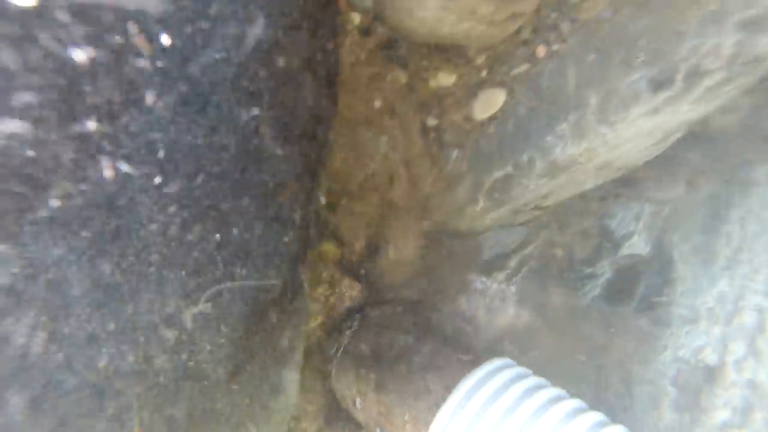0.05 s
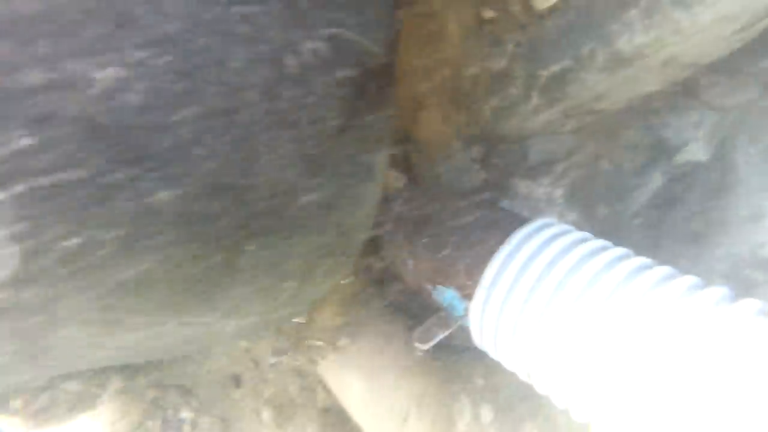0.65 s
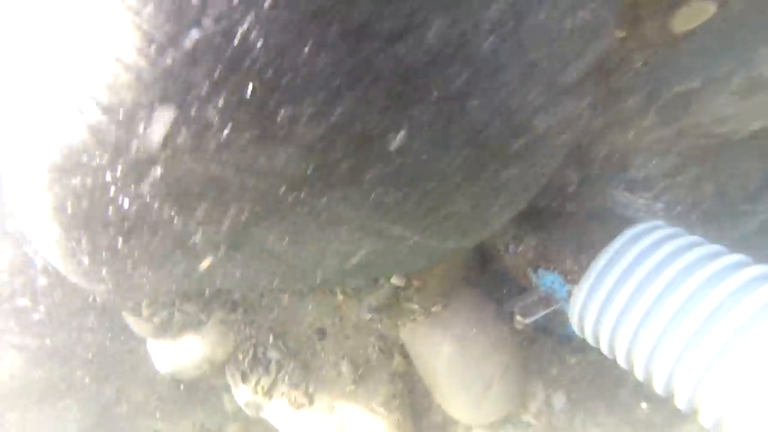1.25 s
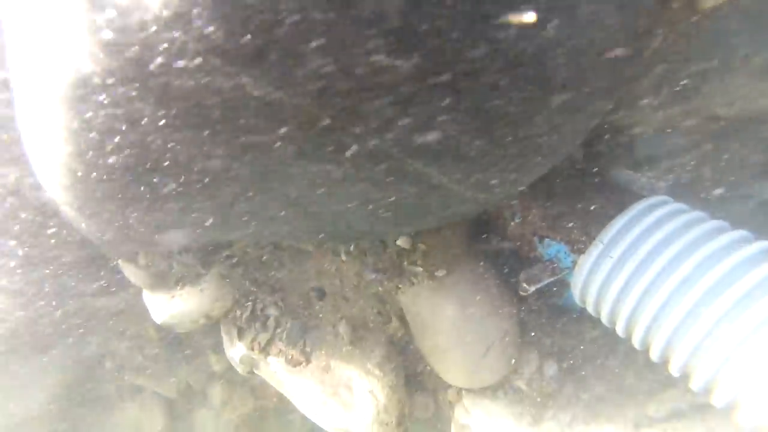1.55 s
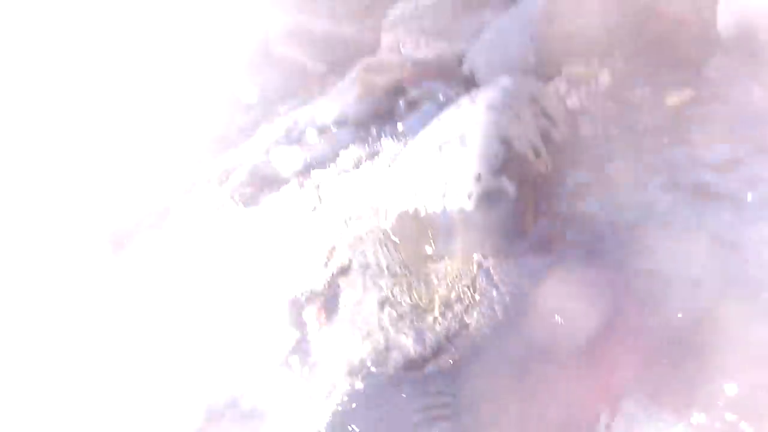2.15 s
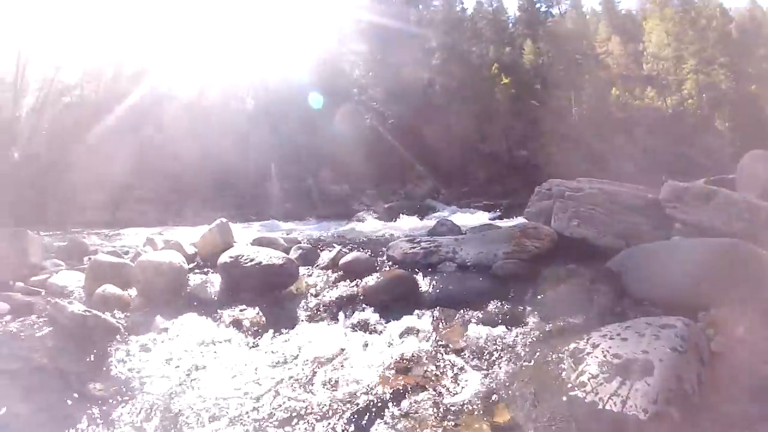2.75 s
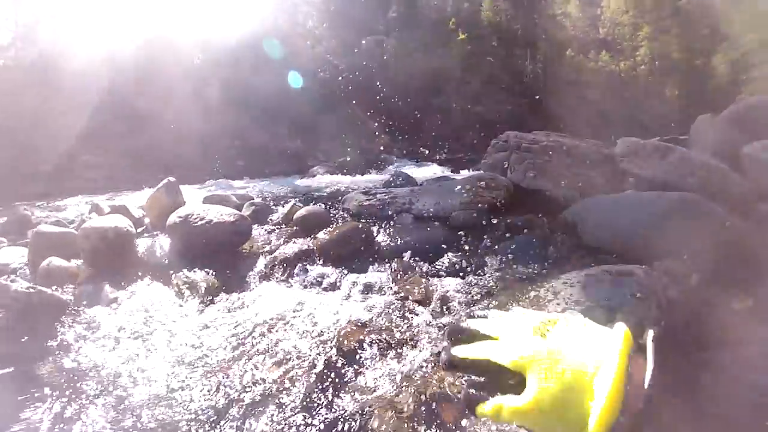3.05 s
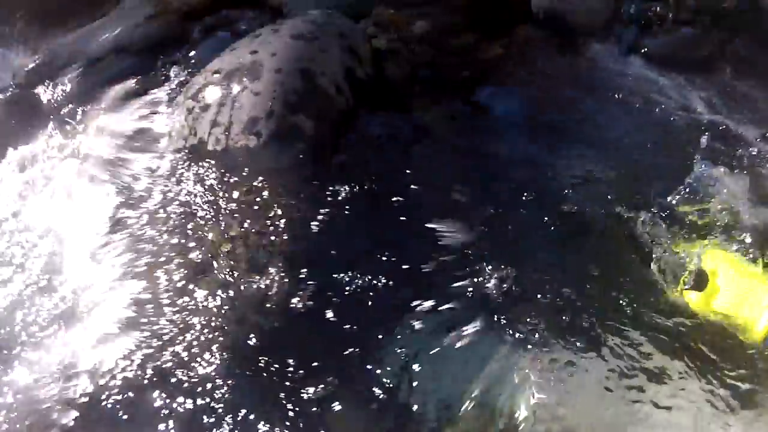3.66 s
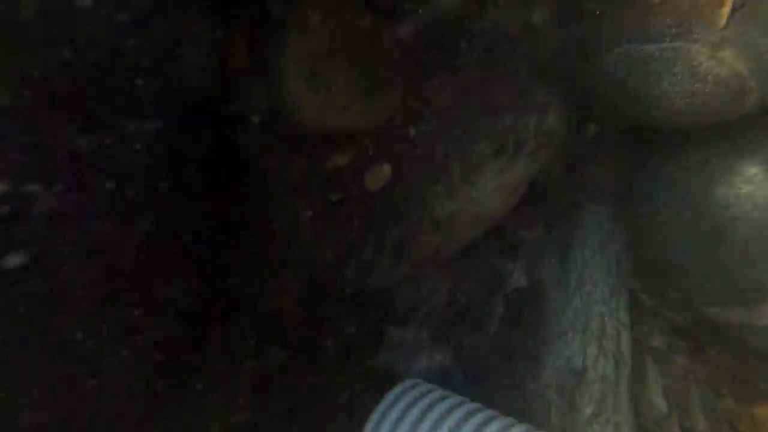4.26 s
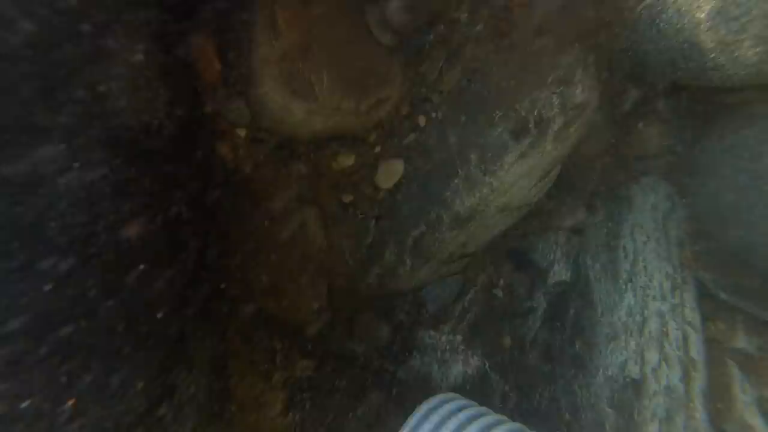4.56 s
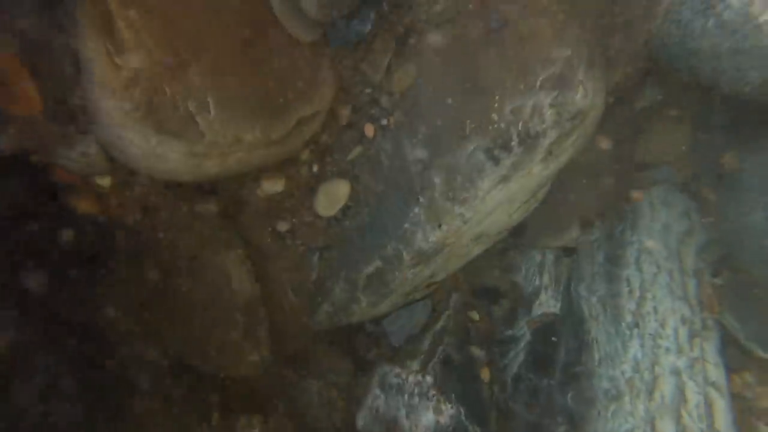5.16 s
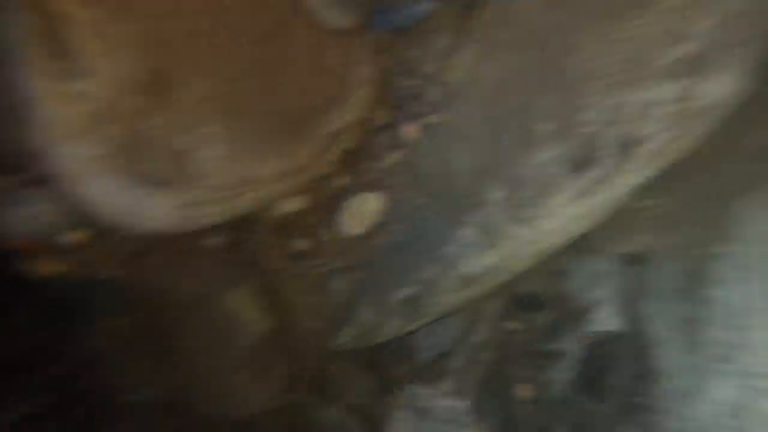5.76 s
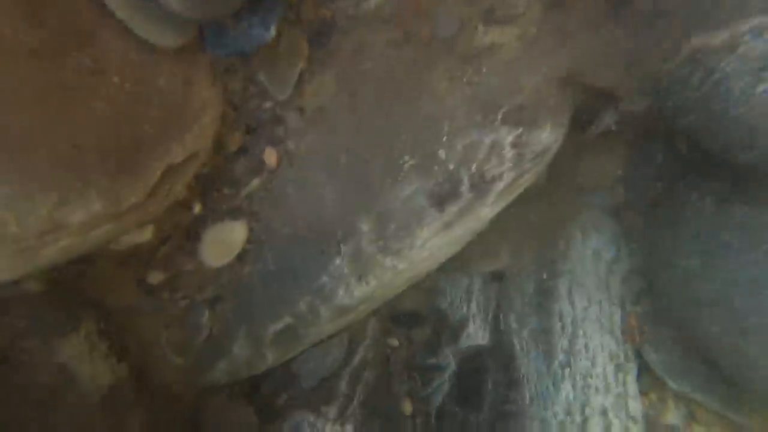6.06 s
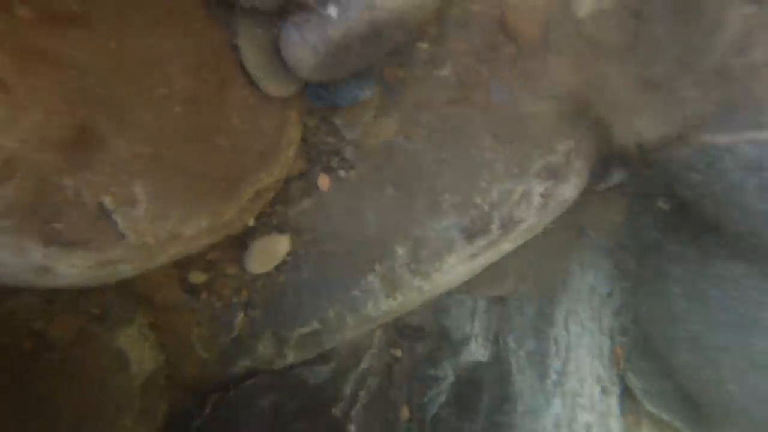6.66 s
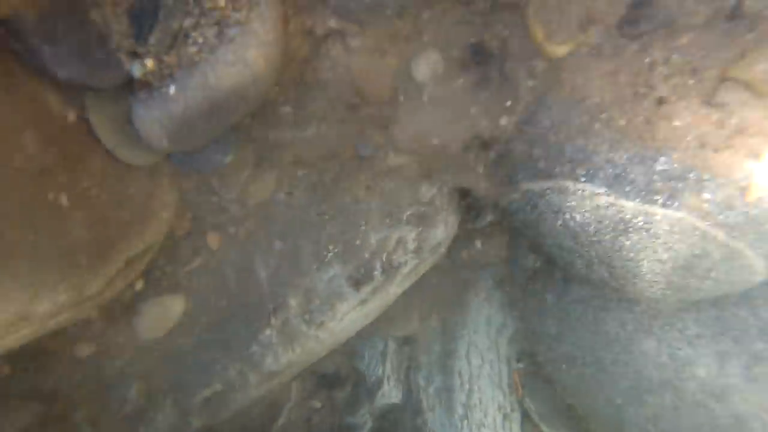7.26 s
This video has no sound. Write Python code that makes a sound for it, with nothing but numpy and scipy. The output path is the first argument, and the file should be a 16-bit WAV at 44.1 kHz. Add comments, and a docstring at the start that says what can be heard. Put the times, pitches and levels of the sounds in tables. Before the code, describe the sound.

Close underwater, stones clack and ring against a suction dredge nozzle over crackling sand and a low intake rumble. The microphone, in a waterproof case, lifts into the air, where rapids rush more quietly and a small pump engine ticks faintly. It plunges back with a loud burst of ringing bubbles and a faint whistle. Gravel then rattles in, stones clack, and cobbles thud against the hose, hardest near the end.

```python
"""A camera in a waterproof case sits by the nozzle of a suction dredge on a stream bed: stones clack up the
hose, ringing nozzle and case, sand crackles and the intake rumbles. By 1.8 s the camera is up in the air,
where rapids rush and the pump's single-cylinder engine ticks. At 4 s it plunges back through a burst of
ringing bubbles, trailed by a faint whistle. From about 4.8 s gravel rattles in, and cobbles thud against
the hose, hardest near the end."""
import sys
import numpy as np
from scipy import signal
from scipy.fft import rfft, irfft, next_fast_len
from scipy.io import wavfile
from scipy.ndimage import uniform_filter1d

SR = 44100
rng = np.random.default_rng(int(sys.argv[2]) if len(sys.argv) > 2 else 0)


def dump_mix(stems):
    """Bounce the given channels to the path in sys.argv[1] as a 16-bit WAV at rate SR."""
    frames = np.atleast_2d(stems).T  # one column per channel
    limited = np.clip(frames, -1, 1)  # hard clip at full scale
    pcm = np.round(limited * 32767).astype(np.int16)
    wavfile.write(sys.argv[1], SR, pcm)


N = 326781
T = np.arange(N) / SR
RING_T = np.arange(4096) / SR
MIDDLE_STONE_HZ = 2000

# larger stones striking nozzle and hose: t/s, ring level/dB, ring f/Hz, crack against the ring/dB
STONE_HITS = [(0.044, -36.5, 1900, -9), (0.0615, -31, 1760, -11), (0.1762, -33.5, 1806, -45),
              (0.202, -26, 2110, -21), (0.2126, -21.5, 2000, -26), (0.2858, -36.5, 1830, -5),
              (0.3397, -33, 1760, -7), (0.4109, -32.5, 1700, -1.5), (0.4542, -34.5, 1784, -7),
              (0.5726, -38.5, 2240, -3), (0.634, -24.5, 1435, -7), (0.6959, -20.5, 2310, -9.5),
              (0.744, -17, 2370, -20.5), (0.7703, -35.5, 2530, -7), (0.806, -29.5, 2290, -10),
              (0.8206, -22, 1660, -11.5), (0.885, -22, 1690, -16), (0.9677, -34, 1550, -13),
              (1.006, -18.5, 1745, -17), (1.0642, -34.5, 2050, -2), (1.076, -25, 2220, -6.5),
              (1.1046, -26.5, 2150, -5), (1.1146, -26.5, 2110, -5), (1.147, -37.5, 2200, -5),
              (1.2034, -38.5, 2190, 3), (1.2954, -32, 2120, -7.5), (1.3769, -22.5, 1965, -12),
              (1.431, -42.5, 2270, -1), (1.4637, -48.5, 2170, 10.5), (1.5011, -23, 2000, -15.5),
              (1.52, -31.5, 1875, -11), (1.558, -30.5, 1670, -15), (1.6213, -38.5, 2060, 0.5),
              (1.7962, -44.5, 2250, -0.5), (1.8571, -43.5, 1900, -3.5), (4.8384, -25, 2320, -11.5),
              (4.8578, -26, 1920, -23), (4.8811, -24.5, 1950, -22), (5.0727, -19.5, 2140, -9),
              (5.1295, -13, 2160, -36), (5.1684, -12, 1760, -24.5), (5.226, -16, 2050, -22),
              (5.2667, -21.5, 1710, -16.5), (5.3319, -19.5, 2280, -35), (5.3485, -26, 2100, -13),
              (5.4353, -25, 2400, -18.5), (5.5313, -23, 2300, -13.5), (5.6684, -21, 2300, -29),
              (5.6801, -19.5, 2130, -43), (5.7247, -26.5, 2360, -7), (5.742, -24.5, 2210, -8),
              (5.7769, -19, 1960, -29), (5.8533, -21, 2280, -14.5), (5.8798, -14, 2230, -17.5),
              (6.0482, -22, 2410, -17), (6.1012, -18.5, 1895, -23.5), (6.1219, -15, 1772, -20.5),
              (6.176, -27, 2350, -40), (6.561, -16, 1820, -52), (6.5798, -20.5, 1770, -24.5),
              (6.61, -23.5, 1800, -19.5), (6.6653, -27.5, 2425, -6.5), (6.7801, -16.5, 2450, -23),
              (6.797, -26, 2380, -25), (6.81, -25, 1800, -5.5), (6.8899, -25.5, 2240, -20),
              (6.954, -7.5, 1836, -31.5), (7.0972, -17.5, 1890, -24.5), (7.166, -31, 2450, -19),
              (7.2364, -24, 2106, -31), (7.3143, -33.5, 2340, -6.5), (7.3712, -31, 2000, -13)]
# turbulence in the intake: t/s, level/dB
TURBULENCE = [(0, -42), (0.25, -51), (0.5, -58), (1.1, -65.5), (3.8, -60.5), (4.66, -62), (4.88, -45),
              (5.1, -39), (5.45, -41.5), (5.7, -48), (5.95, -51), (6.1, -40.5), (6.55, -33), (6.7, -50),
              (7.41, -45)]
# a blow's four registers (knock, ring, clink, crack): low f/Hz, high f/Hz
REGISTER_BANDS = ((420, 1200), (1350, 2750), (2950, 4500), (4200, 18000))
REGISTER_FILTERS = [signal.butter(3, band, "bandpass", fs=SR, output="sos") for band in REGISTER_BANDS]


def stones(knock_db_per_octave=-9):
    """Stones hit the nozzle: heavy ones ring lower and knock more, hard contacts clink more."""
    # how close the case is to the nozzle: t/s, nearness (0 is far)
    nearness = [(0, 0.56), (0.2, 1), (0.45, 0.26), (0.65, 0.86), (1.15, 0.73), (1.45, 1.2), (1.8, 0.32),
                (4.9, 0.22), (6.1, 0), (7.0, 0.39)]
    out = np.zeros(N)
    for s, db, hz, crack in STONE_HITS:
        near = curve(nearness, s)
        knock = -30 + 21 * near + knock_db_per_octave * np.log2(hz / MIDDLE_STONE_HZ)
        clink = -4 + 7 * near + 0.46 * crack
        blow = pebble(hz, near, own_db=1, own_t60=0.026, scatter_db=3, rebound=0.3, crunch=0.41)
        add(out, s, undb(db + np.array([knock, 0, clink, crack])) @ blow)
    return out


def pebble(ring_hz, near=0, own_db=0, own_t60=0.023, scatter_db=6, scrape=0.056, rebound=0.39,
           crunch=0.26):
    """One blow rings stone, nozzle and case: four registers, each at rms 1 over its first 10 ms."""
    # resonances of nozzle and case together: f/Hz, level/dB, t60/s, gain close to the nozzle/dB
    resonances = [(596, -24.5, 0.015, 13.5), (783, 1.5, 0.029, -4.5), (878, 1.5, 0.04, 0),
                  (1024, -7, 0.07, 14), (1328, -32, 0.13, -6), (1760, -8, 0.057, -4),
                  (2050, -0.5, 0.013, -2), (2380, -1, 0.015, -3), (3376, 11.5, 0.0097, -1.5),
                  (3763, -1.5, 0.014, 8), (4360, -0.5, 0.0096, -7.5), (4846, 1, 0.014, -5.5),
                  (5440, -1, 0.0066, 4.5), (6890, 6.5, 0.0023, 9.5), (8000, 4.5, 0.0037, -0.5),
                  (9590, 2.5, 0.0029, 7), (11140, 7.5, 0.0019, 1.5), (14800, -8.5, 0.0063, -15)]
    hz, db, t60, near_db = np.transpose(resonances + [(ring_hz, own_db, own_t60, 0)])
    detune, scatter, polarity = rng.standard_normal((3, len(hz)))
    hz = hz * (1 + 0.025 * detune * np.minimum(1, 0.0117 / t60))  # long rings hold their pitch best
    # each spot drives the modes its own way
    gain = undb(db + near * near_db + scatter_db * scatter) * np.sign(polarity)
    modes = gain[:, None] * np.sin(2 * np.pi * hz[:, None] * RING_T) * fade(t60[:, None])
    registers = (np.digitize(hz, (1250, 2850, 4600)) == np.arange(4)[:, None]) @ modes
    # a scrape builds to a sharp push, then a rebound and a faint rattle; crushed sand roughens the crack
    touch = SR // 1500
    friction = scrape * fade(0.018) + 0.017 * fade(0.064)
    roughness = np.array([friction, friction, friction, friction + crunch * fade(0.0071)])
    push = rng.standard_normal(len(RING_T)) * roughness
    push[:, :touch] *= np.linspace(0, 1, touch)
    push[:, touch] += 1
    push[:, touch + int(rng.random() * 0.007 * SR)] += rebound * rng.standard_normal()
    parts = signal.fftconvolve(registers, push, axes=1)[:, :len(RING_T)]
    parts = np.array([signal.sosfilt(sos, part) for sos, part in zip(REGISTER_FILTERS, parts)])
    return parts / np.sqrt(np.mean(parts[:, :SR // 100] ** 2, axis=1, keepdims=True))


def grit(flow, near, register_db, size_db, dragged_db, crack_slope, count=2100, clump_lag_s=0.016):
    """Grains of very unequal size ring nozzle and case; every stone drags a clump just behind it."""
    blows = [pebble(hz, near) for hz in rng.uniform(1570, 2593, size=40)]
    when, size = rng.random((count, 2)).T
    times = flow[0][0] + when * (flow[-1][0] - flow[0][0])
    sizes = undb(size_db * np.minimum(-np.log(size), 4))
    clump_power = sum(undb(db + dragged_db + swell(times, s + clump_lag_s, 2993, 289)) ** 2
                      for s, db, _, _ in STONE_HITS)
    ring_db = 10 * np.log10(undb(curve(flow, times)) ** 2 + clump_power)
    # a slope under 1 keeps the finest grains crackling in a weak flow
    crack_db = ring_db.mean() + crack_slope * (ring_db - ring_db.mean())
    levels = np.stack([ring_db, ring_db, (ring_db + crack_db) / 2, crack_db], axis=1) + register_db
    hardness_db = rng.standard_normal((count, 1)) * np.array([0, 0, 2, 2.5])  # hard grains are brighter
    gains = unit(sizes)[:, None] * undb(levels + hardness_db)
    out = np.zeros(N)
    for k, s in enumerate(times):
        add(out, s, gains[k] @ blows[k % len(blows)])
    return out


def sand():
    """Sand crackles brightly into the nozzle, fading as the case is lifted away."""
    # stream of sand: t/s, level/dB
    flow = [(0, -45), (0.45, -44), (1.1, -57.5), (1.24, -71), (1.55, -53), (1.85, -85)]
    return grit(flow, near=0.74, register_db=(-18.5, -7, -5, -7.5), size_db=8.5, dragged_db=-25.5,
                crack_slope=0.55)


def gravel():
    """Coarser gravel feeds in with a duller rattle once the case is back down."""
    # stream of gravel: t/s, level/dB
    flow = [(4.55, -78.5), (4.88, -43), (5.15, -36), (5.55, -42), (6.1, -40.5), (6.28, -46), (6.65, -41.5),
            (6.95, -46), (7.41, -53.5)]
    return grit(flow, near=0.13, register_db=(-25, -5, -18, -18), size_db=7, dragged_db=-33.5,
                crack_slope=1)


def thuds(knock_db=-25):
    """Cobbles set the soft hose wall swinging and knock the nozzle."""
    # cobbles against the hose: t/s, level/dB
    cobbles = [(4.434, -22.5), (4.857, -24.5), (4.973, -45), (5.079, -21), (5.288, -42), (5.441, -24),
               (6.58, -3), (7.0959, -3.5)]
    # resonances of the hose wall: f/Hz, level/dB, t60/s
    hose_modes = [(129, -7, 0.058), (188, -13, 0.07), (380, -26.5, 0.03), (535, -17, 0.022)]
    swing = sum(undb(db) * np.sin(2 * np.pi * hz * RING_T) * fade(t60) for hz, db, t60 in hose_modes)
    out = np.zeros(N)
    for s, db in cobbles:
        knock = pebble(MIDDLE_STONE_HZ)[0]
        add(out, s, undb(db) * (swing + undb(knock_db) * knock))
    return signal.sosfilt(signal.butter(2, 85, "highpass", fs=SR, output="sos"), out)


def intake(surge_db=6.5, low_hz=85, high_hz=190, count=240):
    """Water tumbling into the hose rumbles in quick surges, and swallowed air pockets blub in it."""
    # spectrum of the rumble: f/Hz, level/dB
    spectrum = [(40, -10), (75, -9.5), (112, 5.5), (150, 4), (200, -6.5), (260, -7), (340, -17.5),
                (600, -17.5), (1200, -30), (3000, -85)]
    rumble = undb(-1) * unit(colour(rng.standard_normal(N), spectrum) * undb(surge_db * walk(22)))
    gurgle = np.zeros(N)
    for when, pitch, size in rng.random((count, 3)):
        hz = low_hz * (high_hz / low_hz) ** pitch
        add(gurgle, when * N / SR, undb(5 + 10.5 * size) * bubble(hz, t60=0.049))
    return undb(curve(TURBULENCE, T)) * (rumble + gurgle)


def plunge(slap_db=(-42, -20, -35.5, -36), closing_s=0.00123):
    """Air pockets close with a small slap on the case and ring; big ones ring longer."""
    # larger bubbles and drops as the case goes under: t/s, level/dB, f/Hz
    pockets = [(3.498, -33, 623), (4.01, -18.5, 3630), (4.023, -4.5, 2010), (4.031, -9.5, 2340),
               (4.04, -11, 1594), (4.044, -15.5, 1176), (4.057, -9.5, 2510), (4.104, -9.5, 3200),
               (4.125, -19, 3660), (4.133, -17.5, 1530), (4.164, -23, 3400), (4.178, -12, 1233),
               (4.204, -46, 420), (4.236, -40, 460), (4.264, -39, 433), (4.309, -40, 470),
               (4.372, -28, 630), (4.381, -23, 990), (4.404, -28, 684), (4.433, -25.5, 1140),
               (4.444, -31, 1540), (4.517, -19.5, 1260), (4.666, -43.5, 318)]
    out = np.zeros(N)
    for s, db, hz in pockets:
        slap = undb(slap_db) @ pebble(1963)
        ring = bubble(hz, t60=0.023 * (1500 / hz) ** 0.54)
        add(out, s + closing_s, undb(db - 2) * (ring + slap))
    return out


def bubble(hz, t60, rise=0.34, sink=0.11, onset_turns=0.67):
    """A big bubble rises in pitch as it floats up; a small one dragged under sinks in pitch."""
    glide = rise if hz < 1000 else -sink
    pitch = hz * (1 + glide * np.minimum(RING_T / t60, 2))
    turns = np.cumsum(pitch) / SR
    return np.sin(2 * np.pi * turns) * np.minimum(turns / onset_turns, 1) * fade(t60)


def froth(start_s, end_s, low_hz, high_hz, db, fade_db, count=70):
    """A cloud of small ringing bubbles, the later ones quieter."""
    out = np.zeros(N)
    for when, pitch, softness in rng.random((count, 3)):
        hz = low_hz * (high_hz / low_hz) ** pitch
        gain = undb(db + fade_db * when - 4 * softness)
        add(out, start_s + when * (end_s - start_s), gain * bubble(hz, t60=24 / hz))
    return out


def snaps(register_db=(-30, -21, -21, -13)):
    """Tiny bubbles burst on the sinking case with a bright tick."""
    # bursts: t/s, level/dB
    bursts = [(3.9932, -28.5), (4.172, -25.5), (4.3571, -20), (4.3989, -24.5), (4.4285, -25),
              (4.4665, -30.5), (4.5371, -29.5), (4.576, -33), (4.6838, -33.5), (4.7192, -33.5)]
    out = np.zeros(N)
    for s, db in bursts:
        add(out, s, undb(db) * undb(register_db) @ pebble(1870, scrape=0.04, crunch=0.03))
    return signal.sosfilt(signal.butter(2, 8500, fs=SR, output="sos"), out)


def rapids(facing_db, rush_db=-59, spray_db=-63.5, grain=0.21):
    """White water: countless tiny splashes merge into a steady rush and a brighter spray."""
    # spectrum of the rush: f/Hz, level/dB
    rush_spectrum = [(100, -6), (300, 3), (900, 2), (1150, 8), (1600, 11.5), (1900, 4.5), (2350, 15.5),
                     (2900, -2.5), (4700, -49), (7400, -34), (12500, -14), (16000, -39)]
    # spectrum of the spray: f/Hz, level/dB
    spray_spectrum = [(1500, -19.5), (3000, 4.5), (4700, 2), (5200, -4), (5700, 0.5), (6200, -7),
                      (7400, 0.5), (8400, -14), (9700, -8), (12000, -26), (16000, -23)]
    out = np.zeros(N)
    for spectrum, db in (rush_spectrum, rush_db), (spray_spectrum, spray_db + facing_db):
        splashes = rng.standard_normal(N) * np.exp(grain * walk(350))
        out += undb(db) * colour(splashes, spectrum)
    return out


def engine(facing_db, firing_hz=27.85, firing_s=1.9135, valve_lag_s=0.0017, rise_s=0.002, decay_s=0.0034):
    """Each firing gives a sharp chuff and a weaker valve tick; the exhaust hums on their harmonics."""
    # spectrum of chuff and tick: f/Hz, level/dB
    spectrum = [(2500, -20), (4700, -1), (7300, 1), (8400, -7), (9600, -1.5), (12000, -9), (13500, -33),
                (15000, -16)]
    # exhaust hum: multiple of the firing rate, level/dB
    harmonics = [(4, -99), (5, -77.5), (6, -79), (7, -77.5), (9, -79), (10, -81), (13, -83), (15, -87.5)]
    turns = (T - firing_s) * firing_hz
    ages = np.array([turns, turns - valve_lag_s * firing_hz]) % 1 / firing_hz
    chuff, valve = np.minimum(ages / rise_s, 1) * np.exp(-np.maximum(ages - rise_s, 0) / decay_s)
    hiss = colour(rng.standard_normal(N), spectrum) * undb(2 * walk(25.8))
    ticks = unit((chuff + undb(-14) * valve) * hiss)
    hum = sum(undb(db + 3.5 * walk(3.07)) * np.sqrt(2) * np.sin(2 * np.pi * (k * turns + rng.random()))
              for k, db in harmonics)
    return undb(-66 + facing_db) * ticks + hum


def buffet(current_db=-11, push_db=-42, push_s=4.083, still_db=-74):
    """Slow pressure swings on the case: the intake's current, gusts in air, the push of going under."""
    # breaths of wind: t/s, level/dB
    gusts = [(2.1, -65), (2.6, -71), (2.95, -56)]
    current = undb(curve(TURBULENCE, T) + current_db)
    wind = sum(undb(db + swell(T, s, 63, 52)) for s, db in gusts)
    push = undb(push_db + swell(T, push_s, 81, 150))
    level = np.sqrt(current ** 2 + wind ** 2 + push ** 2 + undb(still_db) ** 2)
    spectrum = [(10, -29), (25, -6), (55, -9), (90, -13.5), (200, -61), (600, -59)]  # f/Hz, level/dB
    swings = colour(rng.standard_normal(N), spectrum)
    return level * unit(swings * undb(2 * walk(12)))


def whistle(band_hz=(5690, 5910), peak_s=4.24):
    """A narrow, breathy whistle and a faint hiss come and go after the plunge."""
    # spectrum of the hiss: f/Hz, level/dB
    spectrum = [(2000, -30), (3300, 1), (4200, -22), (5200, -11), (7500, -6), (12000, -7), (16000, -29)]
    hiss = colour(rng.standard_normal(N), spectrum)
    level_db = -66 + swell(T, peak_s, 66, 25) + 2 * walk(29)
    band = signal.butter(2, band_hz, "bandpass", fs=SR, output="sos")
    tone = unit(signal.sosfilt(band, rng.standard_normal(N)))
    return undb(level_db) * (tone + undb(-2) * hiss)


def undb(db):
    """Decibels to gain."""
    return 10 ** (np.asarray(db) / 20)


def unit(x):
    """Scale to rms 1."""
    return x / np.sqrt(np.mean(x ** 2))


def curve(table, at):
    """A (t/s, value) envelope at the given times."""
    return np.interp(at, *np.transpose(table))


def add(out, s, sound):
    """Mix a sound in at time s."""
    i = int(np.clip(s * SR, 0, N - 1))
    out[i:i + len(sound)] += sound[:N - i]


def walk(rate_hz):
    """Smooth random wander with a spread near 1."""
    wander = np.interp(T * rate_hz, np.arange(4096), rng.standard_normal(4096))
    return 1.2 * uniform_filter1d(wander, int(SR / rate_hz) // 2)


def colour(x, points):
    """EQ a signal through (f/Hz, level/dB) points; rms 1."""
    hz, db = np.transpose(points)
    size = next_fast_len(N)
    f = np.maximum(np.arange(size // 2 + 1) * SR / size, 1)
    gain = undb(np.interp(np.log(f), np.log(hz), db))
    return unit(irfft(rfft(x, size) * gain, size)[:N])


def fade(t60):
    """Exponential decay over the length of one ring."""
    return np.exp(-np.log(1000) * RING_T / np.maximum(t60, 1e-3))


def swell(at, peak_s, rise_db_per_s, fall_db_per_s):
    """Level in dB that climbs to 0 at peak_s and falls away after it."""
    return -np.maximum((peak_s - at) * rise_db_per_s, (at - peak_s) * fall_db_per_s)


def scene(leak=0.59, upstream_s=2.86):
    """The dredge leads under water; river and engine leak through, and come up in the air."""
    grains = sand() + gravel()
    in_air = np.interp(T, [0.9, 1.8, 3.98, 4.25], [0, 1, 1, 0])
    facing_db = np.maximum(swell(T, upstream_s, 6.5, 6.5), -2)  # spray and ticks peak facing upstream
    above = (leak + (1 - leak) * in_air) * (rapids(facing_db) + engine(facing_db))
    below = intake() * (1 - 0.7 * in_air) + thuds() + stones() + grains + whistle()
    fizz = froth(start_s=4.02, end_s=4.08, low_hz=970, high_hz=8800, db=-29, fade_db=-7.5)
    wake = froth(start_s=4.08, end_s=4.55, low_hz=426, high_hz=2680, db=-40, fade_db=-9.5)
    return (below + above + plunge() + fizz + wake + snaps() + buffet())[None]


def record(dry, notch_hz=8500, notch_mix=0.61, top_hz=15300):
    """The case dulls a narrow treble band; the loudest blows clip and the top is cut."""
    notched = signal.lfilter(*signal.iirnotch(notch_hz, 7, fs=SR), dry)
    cased = dry + notch_mix * (notched - dry)
    return signal.sosfilt(signal.ellip(8, 0.2, 70, top_hz, fs=SR, output="sos"), np.clip(cased, -1, 1))


dry = scene()
out = record(dry)
dump_mix(out)
```